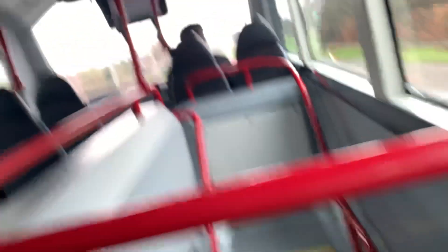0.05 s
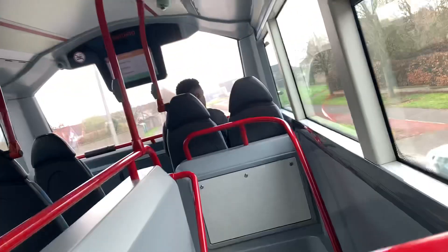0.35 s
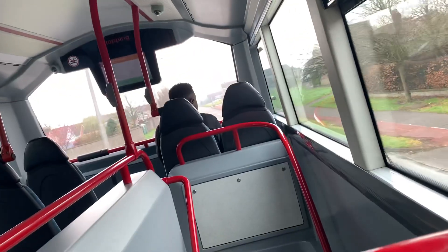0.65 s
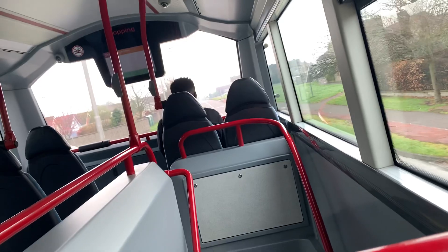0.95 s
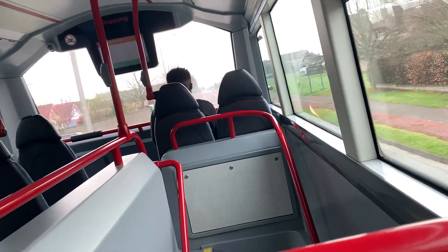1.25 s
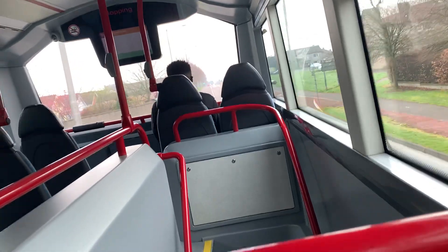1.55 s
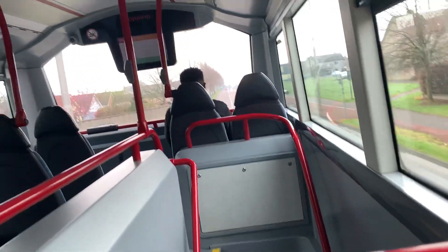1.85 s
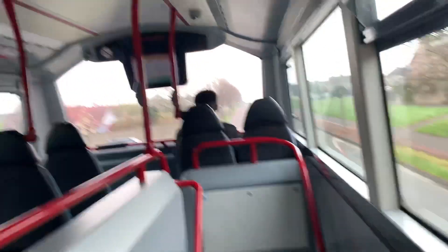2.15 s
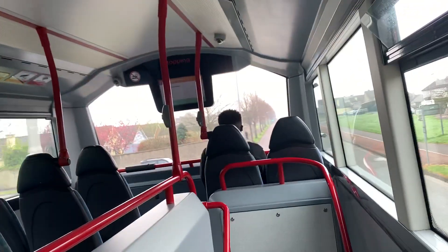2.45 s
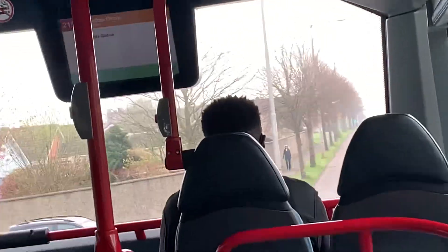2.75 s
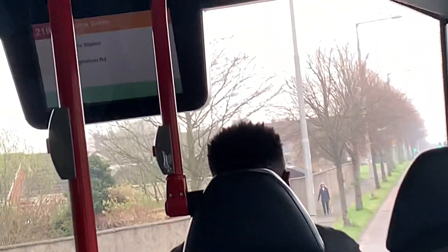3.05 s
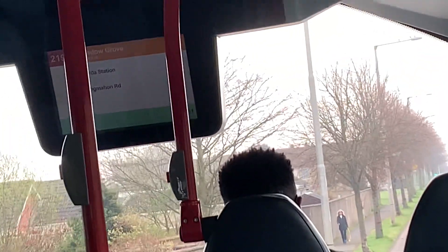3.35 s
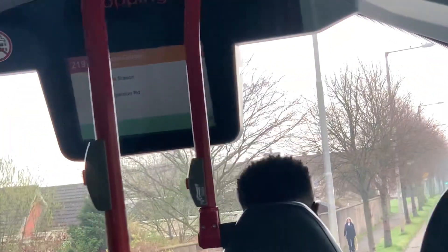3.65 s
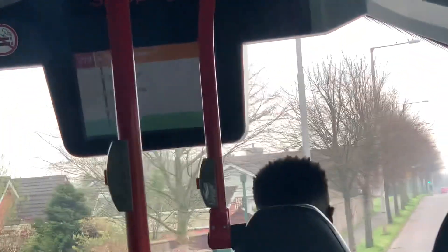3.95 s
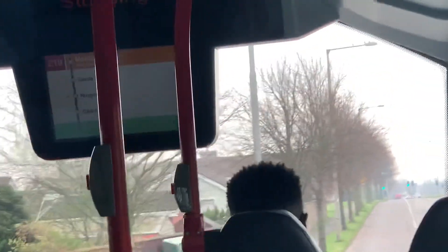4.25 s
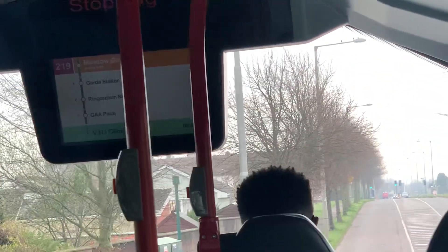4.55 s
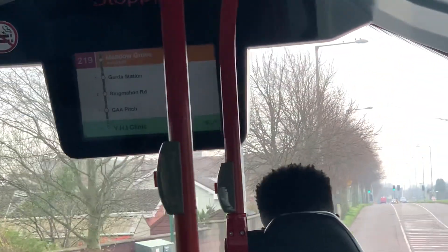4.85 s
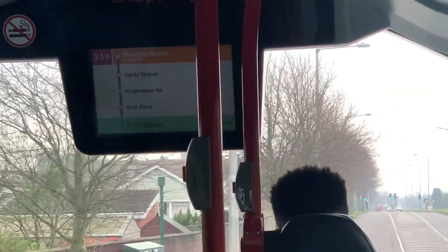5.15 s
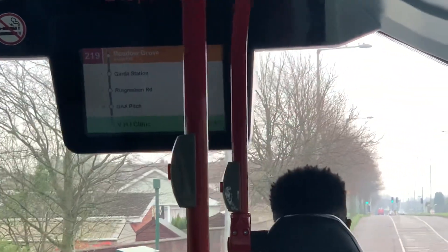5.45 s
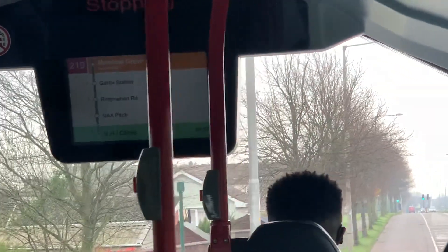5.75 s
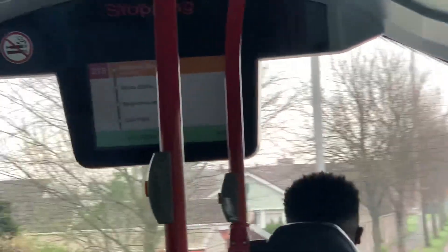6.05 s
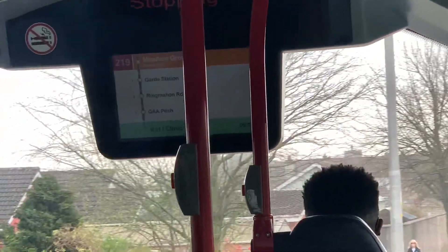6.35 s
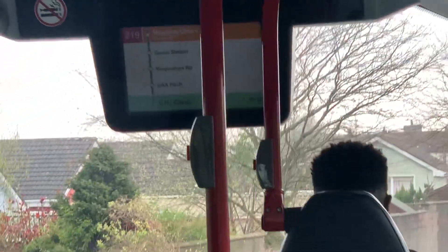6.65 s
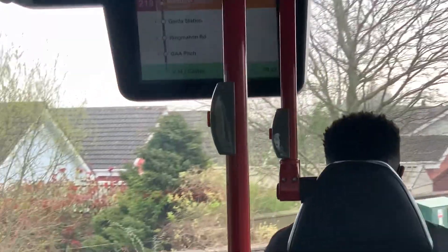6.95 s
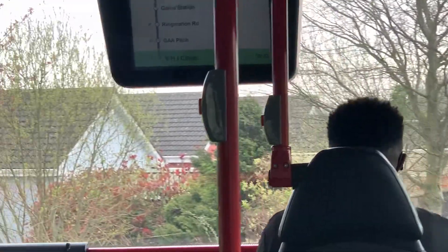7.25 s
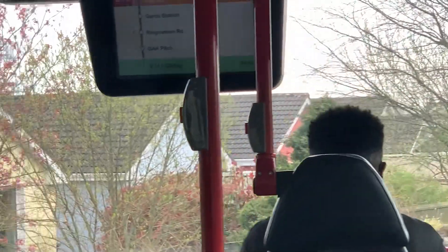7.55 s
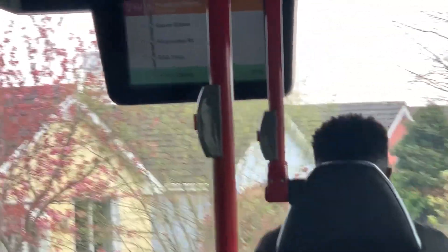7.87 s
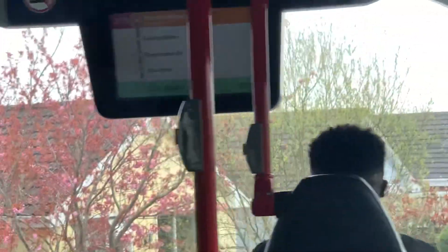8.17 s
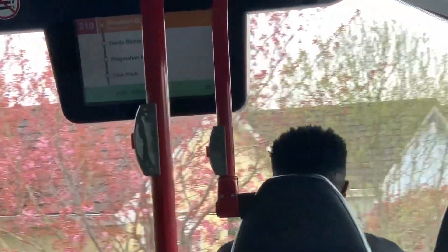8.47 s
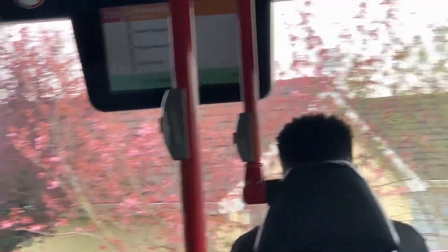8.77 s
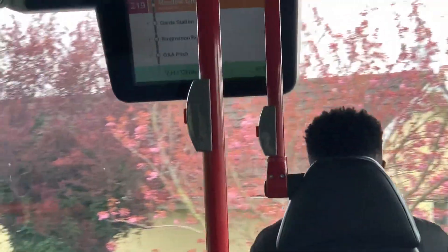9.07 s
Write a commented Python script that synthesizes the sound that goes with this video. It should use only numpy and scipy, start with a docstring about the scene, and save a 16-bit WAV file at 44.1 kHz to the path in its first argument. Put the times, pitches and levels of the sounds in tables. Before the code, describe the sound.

Deep road boom, engine drone and rattling trim fill a slowing bus's upper deck, with a few close finger knocks.

```python
"""A diesel drone and a deep road boom, heard on a hand-held phone on a double-decker bus's upper deck.
The engine pulls under load, then sinks to idle as the bus slows; the tyres boom through the body
and shake the trim into rattles all round the cabin. The brakes hiss and squeal thinly, and a loose
panel bumps. Right at the microphones, fingers knock, tick and rub on the phone's case."""
import sys
import numpy as np
from scipy import signal
from scipy.io import wavfile

SR = 44100
rng = np.random.default_rng(int(sys.argv[2]) if len(sys.argv) > 2 else 0)


def store_pcm(level_fs):
    """Save levels as 16-bit WAV."""
    pcm = np.round(np.clip(level_fs, -1, 1) * 32767).astype(np.int16)
    wavfile.write(sys.argv[1], SR, np.atleast_2d(pcm).T)


N = 406161
TIME = np.arange(N) / SR
JOLT_RISE_S = .003

# Levels are relative within a layer. A slope is the dB a sound moves per dB of load or road noise.
# engine speed, sinking to idle: time_s, firing_hz
FIRING_RATE = [(0, 40.1), (.4, 41.5), (.8, 42), (1.6, 41.6), (2.9, 39.7), (3.6, 35.5), (4.05, 33.8),
               (4.5, 35.3), (5.1, 34.6), (5.55, 32.8), (6.2, 25.3), (6.55, 23.3), (7, 23.6), (7.4, 21.6),
               (8, 23.3), (9.2, 23.8)]
# engine load against full load: time_s, load_db
ENGINE_LOAD = [(0, -1), (1.05, -2.5), (1.2, -8), (2.4, -7.5), (3.2, -7.5), (4.15, -24.5), (4.6, -21),
               (6.2, -14.5), (7.5, -7), (8.3, -17.5), (9.2, -12)]
# orders of the engine and its shafts: ratio_to_firing
ORDER_RATIOS = [.53, 1, 1.6, 2, 2.17, 3, 3.13]
# drive of each of those orders: full_load_db, load_slope
ORDER_LEVELS = [(-22, 1), (-13.3, 1.35), (-22.3, .55), (-21, 0.25), (-12.7, 1.3), (-23, .9), (-28.5, 0.45)]
# body resonances between engine and upper deck: centre_hz, width_hz, gain_db
BODY_MODES = [(42, 5.5, -2), (68.5, 8, 0), (124, 12, 0)]
# diesel clatter: frequency_hz, level_db
CLATTER_SPECTRUM = [(700, -10.5), (950, 7), (1350, 6.5), (1700, -8.5), (2200, -20.5), (3200, -16.5)]
# gear whine, coming and going as the teeth take load: time_s, level_db
GEAR_WHINE = [(.08, -46), (.28, -62), (.65, -62), (.9, -55), (1.15, -64), (1.55, -63), (1.8, -52.5),
              (2.2, -48), (2.9, -52), (3.4, -70), (4.5, -100)]

# road noise, falling as the bus slows: time_s, level_db
ROAD_LEVEL = [(0, 1), (3.6, -4), (4.7, -7.5), (6.2, -7), (9.2, -11.5)]
# stretches where boom, drumming and rattle swell or drop away:
# middle_s, length_s, boom_rise_db, drum_rise_db, rattle_rise_db
SWELLS_AND_DIPS = [(0.582, 0.5, 0, -0.5, 5.5), (1.005, 0.75, 2, -3, 8), (1.585, 1.2, 5, 0, 4.5),
                   (2.243, 1.5, 3, -1, 0), (2.75, 0.56, -0.5, 3, -10), (3.111, 0.41, 2, 2.5, 0),
                   (3.861, 1.2, 6, 3.5, 4), (4.491, 0.67, 5.5, 1, 1), (4.886, 0.28, -4, 1.5, -3.5),
                   (5.112, 1.5, 5, -1, -8), (5.848, 0.1, 5.5, -15, 3), (5.903, 0.86, 3, -0.5, -5),
                   (6.775, 0.55, 0, 7.5, 6.5), (7.252, 1.16, 2.5, 0.5, 14), (7.653, 0.76, 0, 3.5, 7.5),
                   (8.584, 0.53, -1, 5, 4), (9.038, 0.86, 1, 1, 1)]
# body boom, floor drumming and tyre roar from outside: frequency_hz, level_db
BOOM_SPECTRUM = [(18, -31.5), (30, -7.5), (45, 0), (56, -2.5), (68, 6.5), (82, 4.5), (98, 2), (120, -17),
                 (160, -30.5), (250, -29)]
DRUM_SPECTRUM = [(90, -31), (125, 7), (155, -0.5), (195, -5), (250, -16), (340, -19), (500, -41.5),
                 (900, -46)]
ROAR_SPECTRUM = [(200, -8.5), (330, 5), (470, 3), (680, 3), (860, -4), (1100, -9.5), (1600, -9.5),
                 (2400, -14.5), (4000, -43), (7000, -67.5), (12000, -33)]
# hollow rings of the cabin: pitch_hz, t60_s, level_db, road_slope
CABIN_MODES = [(292, 0.026, -56, -0.6), (463, 0.031, -57, 0.1), (850, 0.026, -54, 1),
               (1410, 0.018, -61.5, 2.4)]
# how alike the cabin sounds at the two microphones: frequency_hz, correlation
MIC_LIKENESS = [(60, 0.85), (130, 0.84), (260, 0.83), (550, 1), (1160, 0.083), (2400, 0.15), (10600, 0.028)]

# rattle of the trim: frequency_hz, level_db
RATTLE_SPECTRUM = [(500, 8), (900, 15.5), (1600, 11.5), (2400, 7.5), (3300, 0.3), (4400, -2), (5200, -14),
                   (6300, -7.5), (7400, -23), (11000, -17), (14000, -20)]
# fine, high sizzle: frequency_hz, level_db
SIZZLE_SPECTRUM = [(7900, 0), (8350, 0), (9400, -10), (11000, -14), (14000, -22)]
# ringing modes of the trim: centre_hz, width_hz, gain_db
TRIM_RINGS = [(3000, 11, -4), (3530, 360, -0.5), (3760, 330, -8.5), (4350, 98, -2.5)]
# jolts that throw the trim about: start_s, level_db
TRIM_JOLTS = [(0.062, -58), (.376, -50), (0.433, -45), (0.5, -49.5), (.572, -57), (.666, -56.5),
              (0.73, -56), (0.801, -50.5), (.886, -59), (0.934, -48), (0.986, -46.5), (1.03, -53),
              (1.382, -47), (1.45, -53.5), (1.544, -56.5), (1.653, -57.5), (1.721, -53.5), (1.784, -52),
              (1.814, -50.5), (2.174, -58.5), (2.419, -53), (3.034, -58.5), (3.1, -57.5), (3.197, -59),
              (3.327, -62), (3.422, -52.5), (3.523, -55), (3.595, -59), (3.723, -56), (3.781, -46),
              (3.873, -48.5), (4.005, -53.5), (4.048, -55), (4.099, -54), (4.335, -58.5), (4.39, -57),
              (4.445, -60), (4.504, -57.5), (4.648, -54), (4.757, -60), (4.958, -62.5), (5.3, -56),
              (5.33, -53), (5.38, -54.5), (5.435, -55.5), (5.554, -51.5), (5.774, -57.5), (5.904, -58),
              (5.935, -54.5), (6.036, -60), (6.149, -60), (6.59, -52.5), (6.678, -55.5), (6.83, -55),
              (7.43, -54.5), (7.576, -56), (7.707, -54.5), (7.803, -55.5), (8.501, -60), (8.918, -62.5),
              (8.961, -61.5)]

# dull finger knocks, right at the microphones: start_s, level_db, pitch_hz, t60_s
FINGER_KNOCKS = [(2.5214, -19, 560, 0.015), (5.0975, -36, 700, 0.0066), (5.1360, -24, 700, 0.0082),
                 (5.304, -39, 570, 0.018), (5.7295, -40, 1080, 0.021), (5.8235, -32, 1040, 0.0057),
                 (5.9693, -27, 750, 0.0027), (6.109, -29.5, 1060, 0.013), (8.7, -36.5, 385, 0.037)]
# modes of the phone's case: ratio_to_pitch, gain_db
CASE_MODES = [(0.701, -10), (1, 7), (1.7, -2)]
# sharp ticks on the case: start_s, level_db
FINGER_TICKS = [(.4312, -52), (1.3826, -47), (3.3825, -49), (3.634, -51), (4.658, -47), (5.093, -40.5),
                (5.301, -35.5), (5.672, -45.5), (5.728, -50), (5.823, -46), (5.9384, -47), (6.109, -47)]
# blows on a loose panel: start_s, level_db
PANEL_BUMPS = [(7.884, -33), (7.926, -31), (7.946, -47), (7.972, -42)]
# modes of that panel: pitch_hz, gain_db, t60_s
PANEL_MODES = [(298, 5.5, 0.12), (368, 2, 0.041), (566, -2.5, 0.042), (1230, 0, 0.0061)]
# brake hiss as heard on the phone: frequency_hz, level_db
AIR_SPECTRUM = [(1000, 8), (2200, 5.5), (3200, 0), (4200, 2.5), (7200, -21), (8200, 5), (10000, -16),
                (14000, -14)]
# thin squeals: start_s, end_s, pitch_hz, level_db
BRAKE_SQUEALS = [(2.92, 3.14, 8900, -73), (6.44, 6.85, 9880, -66), (6.48, 6.6, 9060, -73),
                 (6.52, 7.4, 10260, -77), (7.02, 7.4, 10080, -71), (7.1, 7.76, 4855, -76),
                 (7.63, 7.76, 4870, -71), (7.46, 7.7, 9940, -77), (8.31, 8.53, 8890, -62),
                 (8.52, 8.72, 8220, -68), (8.92, 9.25, 3350, -78)]


def engine(wobble=.005, throb_db=1.62, clatter_db=-49, gating=.24, gear_ratio=11.83, waver_db=2):
    """Engine orders swell as they cross the body's resonances; load drives the clatter; a gear whines."""
    firing_hz = in_time(FIRING_RATE)
    load_db = in_time(ENGINE_LOAD)
    phase = 2 * np.pi * np.cumsum(firing_hz * (1 + wobble * drift(6.18))) / SR
    drone = 0
    for ratio, (db, slope) in zip(ORDER_RATIOS, ORDER_LEVELS):
        drive = from_db(db + slope * load_db + throb_db * drift(40))
        tone = np.sin(ratio * phase + rng.uniform(0, 2 * np.pi))
        drone += drive * body_gain(ratio * firing_hz) * tone
    firing_pulse = 1 + gating * np.cos(phase)
    clatter = cabin_noise(CLATTER_SPECTRUM, flicker_db=4.5, bands=7, drive=firing_pulse)
    whine = from_db(in_time(GEAR_WHINE) + waver_db * drift(29)) * np.sin(gear_ratio * phase)
    return np.sqrt(2) * (drone + whine) + from_db(clatter_db + 1.8 * load_db) * clatter


def body_gain(hz):
    """How strongly the body's resonances carry a tone to the upper deck."""
    powers = [from_db(db) ** 2 / (1 + (2 * (hz - centre) / width) ** 2)
              for centre, width, db in BODY_MODES]
    return np.sqrt(sum(powers))


def road():
    """Tyres shake the body into a boom, drum on the floor and roar outside; the cabin rings hollow."""
    road_db = in_time(ROAD_LEVEL)
    boom_rise, drum_rise, rattle_rise = swells_and_dips()
    boom_db = -25.3 + .42 * road_db + boom_rise
    drum_db = -27.5 + 1.295 * road_db + drum_rise
    roar_db = -48.5 + .4 * road_db + .39 * rattle_rise
    boom = from_db(boom_db) * cabin_noise(BOOM_SPECTRUM, flicker_db=-.2, bands=10)
    drum = from_db(drum_db) * cabin_noise(DRUM_SPECTRUM, flicker_db=2.5, bands=9)
    roar = from_db(roar_db) * cabin_noise(ROAR_SPECTRUM, flicker_db=3, bands=15)
    hollow = sum(from_db(db + slope * road_db) * rms_one(ring(rng.standard_normal((2, N)), hz, t60))
                 for hz, t60, db, slope in CABIN_MODES)
    return boom + drum + roar + hollow


def swells_and_dips():
    """Boom, drumming and rattle swell or drop away for a moment: one curve in dB for each."""
    return sum(np.outer(rises, np.cos(np.pi * np.clip((TIME - middle) / length, -.5, .5)) ** 2)
               for middle, length, *rises in SWELLS_AND_DIPS)


def trim(panels_db=-3.5, ring_db=-1.5, jolt_grain=.4, jolt_sizzle_db=-22):
    """The ride and its jolts shake the trim: panels rattle, ring and sizzle, fittings jangle."""
    road_db = in_time(ROAD_LEVEL)
    _, _, rise_db = swells_and_dips()
    touches = chatter()
    loose = from_db(-62 + .77 * road_db + rise_db) * touches
    thrown = jolts() * touches ** jolt_grain
    shake = from_db(panels_db) * np.hypot(loose, thrown)
    rattle = shake * cabin_noise(RATTLE_SPECTRUM, flicker_db=2.5, bands=25)
    ringing = sum(from_db(ring_db + db) * signal.lfilter(*signal.iirpeak(hz, hz / width, fs=SR), rattle)
                  for hz, width, db in TRIM_RINGS)
    loose_sizzle = from_db(-85.5 - .33 * road_db + .67 * rise_db) * touches
    fine_shake = np.hypot(loose_sizzle, from_db(jolt_sizzle_db) * thrown)
    sizzle = fine_shake * cabin_noise(SIZZLE_SPECTRUM, flicker_db=1.5, bands=10)
    return rattle + ringing + jangle(shake) + sizzle


def chatter(per_s=110, spread_db=2.8, t60_s=.07, blur=.5):
    """Envelope of loose parts touching at random: each touch dies away, far ones blur together."""
    touches = (rng.random(N) < per_s / SR) * from_db(spread_db * np.clip(rng.standard_normal(N), -2, 2))
    energy = signal.lfilter([1], [1, -decay(1 / SR, t60_s) ** 2], touches ** 2 + 1e-18)
    return np.sqrt(energy / energy.mean() + blur)


def jolts(clack=.35, clack_s=.006, hold_s=.026, t60_s=.19):
    """Envelope of the jolts: each starts with a clack, rattles on for a moment and dies away."""
    out = np.zeros(N)
    for start, db in TRIM_JOLTS:
        at = slice(int(start * SR), int((start + .5) * SR))
        age = TIME[at] - start
        attack = np.clip(age / JOLT_RISE_S, 0, 1) * (1 + clack * np.exp(-age / clack_s))
        fall = decay(age - JOLT_RISE_S - hold_s, t60_s)
        out[at] = np.hypot(out[at], from_db(db) * attack * fall)
    return out


def jangle(shake, per_s=110, spread_db=2, range_hz=(1100, 6800), modes=6, t60_s=.15, gain_db=-1.5):
    """Each touch or jolt rings a small fitting with its own modes, strength and place in the cabin."""
    touches = np.flatnonzero(rng.random(N) < per_s / SR)
    jolt_peaks = [int((start + JOLT_RISE_S) * SR) for start, _ in TRIM_JOLTS]
    age = TIME[:int(t60_s * SR)]
    fall = decay(age, t60_s)
    out = np.zeros((2, N + len(age)))
    for at in np.r_[touches, jolt_peaks]:
        hz = rng.uniform(*range_hz, modes)
        gains = from_db(at_hz(RATTLE_SPECTRUM, hz)) * rng.choice([-1, 1], modes)
        clink = fall * (gains @ np.sin(2 * np.pi * np.outer(hz, age)))
        strength = shake[at] * from_db(spread_db * rng.uniform(-.59, 1))
        place = np.pi / 4 + rng.standard_normal() / 2
        out[:, at:at + len(age)] += strength * np.outer([np.cos(place), np.sin(place)], clink)
    return from_db(gain_db) * np.sqrt(np.mean(shake ** 2)) * rms_one(out[:, :N])


def finger_knocks(contact_hz=1700, mic_lag_s=.00033):
    """Soft knocks ring the damped case for a few cycles and reach the right microphone first."""
    out = np.zeros((2, N))
    for start, db, hz, t60 in FINGER_KNOCKS:
        at = slice(int(start * SR), int((start + .1) * SR))
        age = np.maximum(TIME[at] - start - [[mic_lag_s], [0]], 0)
        for ratio, mode_db in CASE_MODES:
            out[:, at] += from_db(db + mode_db) * decay(age, t60) * np.sin(2 * np.pi * hz * ratio * age)
    return signal.sosfilt(signal.butter(6, contact_hz, fs=SR, output="sos"), band(out, 240, 2500))


def panel_bumps(soft_hz=2000, shudder_t60_s=.2):
    """A loose panel is jolted; each soft blow shudders for a moment and sets its modes ringing."""
    blows = np.zeros(N)
    for start, db in PANEL_BUMPS:
        blows[int(start * SR)] = from_db(db)
    pole = decay(1 / SR, shudder_t60_s)
    envelope = signal.lfilter([np.sqrt(1 - pole ** 2)], [1, -pole], blows + 1e-18)
    shudder = envelope * rng.standard_normal((2, N))
    ringing = sum(from_db(db) * ring(shudder, hz, t60) for hz, db, t60 in PANEL_MODES)
    return band(ringing, 89, soft_hz)


def finger_ticks(t60_s=.006, tail_db=-25, tail_t60_s=.09):
    """Hard little contacts on the case, very close: a bright crack and a faint tail."""
    envelope = np.zeros(N)
    for start, db in FINGER_TICKS:
        at = slice(int(start * SR) + 1, int((start + .2) * SR))
        age = TIME[at] - start
        envelope[at] += from_db(db) * (decay(age, t60_s) + from_db(tail_db) * decay(age, tail_t60_s))
    crack = envelope * rng.standard_normal((2, N))
    return from_db(1) * band(crack, 7800, 10000) + from_db(-11.5) * band(crack, 1500, 5000)


def brake_air(start_s=6.2, level_db=-53.5, attack_s=.074, hold_s=.12, t60_s=.46):
    """A valve lets out a short jet of air as the brakes come on: it opens, holds and dies away."""
    age = TIME - start_s
    jet = np.clip(age / attack_s, 0, 1) * decay(age - attack_s - hold_s, t60_s)
    return from_db(level_db) * jet * cabin_noise(AIR_SPECTRUM, flicker_db=2.5, bands=20)


def brake_squeals(waver_hz=65, wander=.0025, flutter_db=3.5, fade_s=.05):
    """Brakes and rubbing parts stick and slip: faint, unsteady tones a little to the left."""
    out = np.zeros(N)
    for start, end, hz, db in BRAKE_SQUEALS:
        swell = np.clip(np.minimum(TIME - start, end - TIME) / fade_s, 0, 1)
        pitch_hz = hz * (1 + wander * drift(4.2)) + waver_hz * drift(250)
        phase = 2 * np.pi * np.cumsum(pitch_hz) / SR
        out += swell * from_db(db + flutter_db * drift(44)) * np.sin(phase)
    return out * pan(2.5)


def finger_rub(start_s=5.135, end_s=5.215, level_db=-69.5):
    """A fingertip slides over the case with a brief, fine rasp."""
    stroke = np.clip((TIME - start_s) / (end_s - start_s), 0, 1)
    swell = np.sqrt(np.abs(np.sin(np.pi * stroke)))
    return from_db(level_db) * swell * cabin_noise(SIZZLE_SPECTRUM, flicker_db=-1.5, bands=6)


def cabin_noise(spectrum, flicker_db, bands, drive=1):
    """Noise at the two microphones, each band with its own flicker and left-right likeness; rms 1."""
    edges = np.geomspace(spectrum[0][0], spectrum[-1][0], bands + 1)
    white = rng.standard_normal((2, 2, N)) * drive
    out = 0
    for k, (low, high) in enumerate(zip(edges, edges[1:])):
        mid, side = band(white[k % 2], low, high)
        hz = np.sqrt(low * high)
        alike = np.clip(at_hz(MIC_LIKENESS, hz), -.99, .99)
        gain = from_db(at_hz(spectrum, hz) + flicker_db * drift(23))
        out += gain * (np.sqrt(1 + alike) * mid + np.sqrt(1 - alike) * side * [[1], [-1]])
    return rms_one(out)


def drift(rate_hz, step=40, settle=2000):
    """Random wander with rms 1, mostly slower than rate_hz."""
    pole = np.exp(-2 * np.pi * rate_hz * step / SR)
    white = rng.standard_normal(N // step + settle + 2)
    slow = signal.lfilter([1], [1, -2 * pole, pole ** 2], white)[settle:]
    return np.interp(np.arange(N) / step, np.arange(len(slow)), rms_one(slow))


def ring(drive, hz, t60_s):
    """One mode: a unit click sets off a dying sine of height 1."""
    pole, angle = decay(1 / SR, t60_s), 2 * np.pi * hz / SR
    return signal.lfilter([0, np.sin(angle)], [1, -2 * pole * np.cos(angle), pole ** 2], drive + 1e-18)


def decay(age_s, t60_s):
    """Gain of 1 until age zero, then falling 60 dB every t60_s."""
    return np.exp(-np.log(1000) * np.maximum(age_s, 0) / t60_s)


def band(x, low_hz, high_hz):
    """Band-pass."""
    return signal.sosfilt(signal.butter(2, [low_hz, high_hz], "band", fs=SR, output="sos"), x + 1e-18)


def in_time(curve):
    """A curve's value at every sample."""
    return np.interp(TIME, *np.transpose(curve))


def at_hz(spectrum, hz):
    """Read a spectrum on a log-frequency axis."""
    points_hz, values = np.transpose(spectrum)
    return np.interp(np.log(hz), np.log(points_hz), values)


def pan(left_db):
    """Gains of the two channels for a left-minus-right level."""
    return from_db(np.array([[left_db], [-left_db]]) / 2)


def from_db(db):
    """Decibels to gain."""
    return 10 ** (np.asarray(db) / 20)


def rms_one(x):
    """Scale to rms 1."""
    return x / np.sqrt(np.mean(x ** 2) + 1e-20)


def scene(mic_lag_s=.00052):
    """From the upper deck: engine and road lean right and reach the left microphone a little later."""
    left, right = (engine() + road()) * pan(-1.6)
    late_left = np.interp(TIME - mic_lag_s, TIME, left)
    fade_in = np.minimum(TIME / .01, 1) ** 2
    rumble = np.array([late_left, right]) * fade_in
    return (rumble + trim() + brake_air() + brake_squeals()
            + finger_knocks() + finger_ticks() + finger_rub() + panel_bumps())


def record(dry, bass_hz=15, lift_db=16, lift_from_hz=7950, lift_top_hz=9400, cutoff_hz=15500):
    """The phone's microphones drop the deepest bass and the top; the right has a steep treble lift."""
    left, right = signal.sosfilt(signal.butter(2, bass_hz, "high", fs=SR, output="sos"), dry)
    treble = signal.sosfilt(signal.ellip(8, 1, 60, lift_from_hz, "high", fs=SR, output="sos"), right)
    lift = from_db(lift_db) * signal.sosfilt(signal.butter(5, lift_top_hz, fs=SR, output="sos"), treble)
    top_cut = signal.cheby2(12, 70, cutoff_hz, fs=SR, output="sos")
    return signal.sosfilt(top_cut, np.array([left, right + lift]))


dry = scene()
out = record(dry)
store_pcm(out)
```